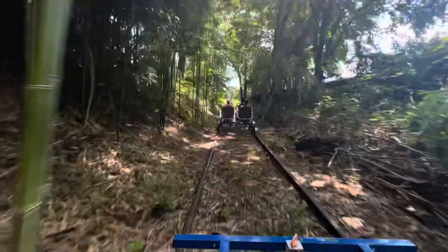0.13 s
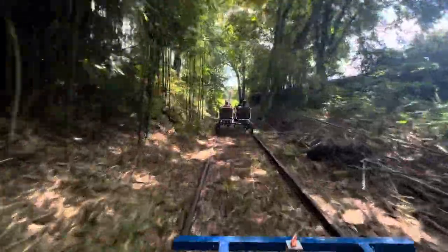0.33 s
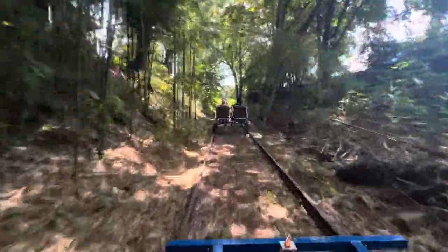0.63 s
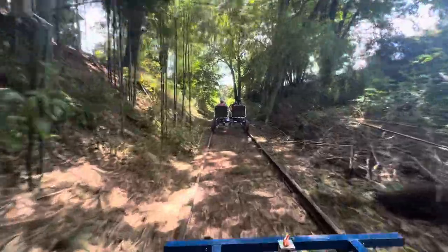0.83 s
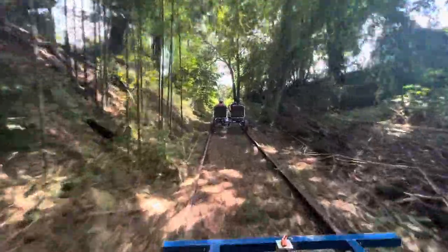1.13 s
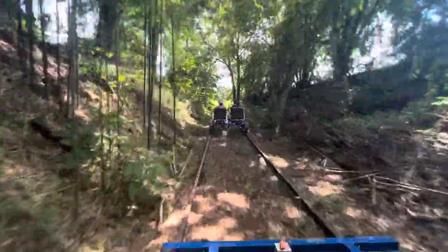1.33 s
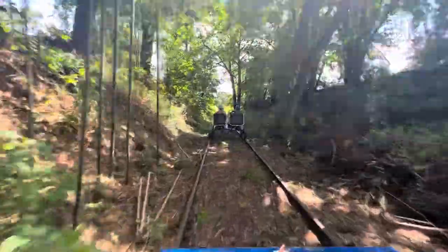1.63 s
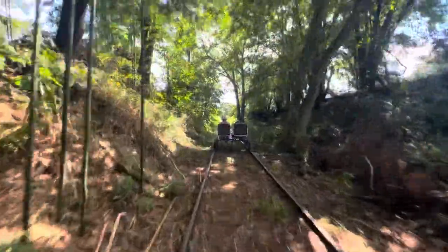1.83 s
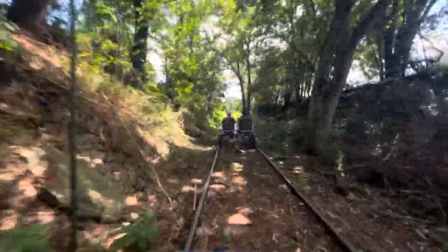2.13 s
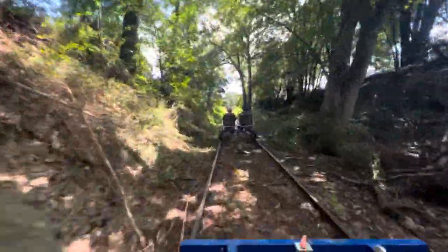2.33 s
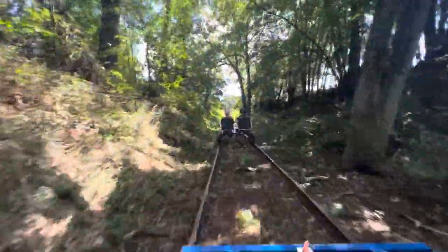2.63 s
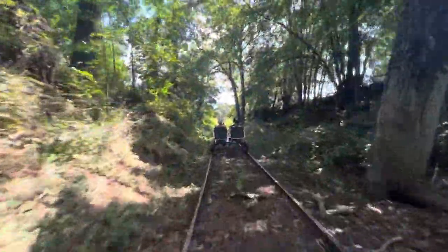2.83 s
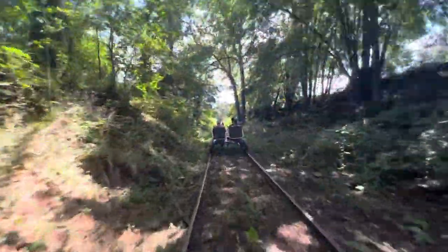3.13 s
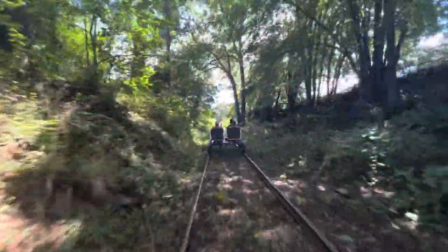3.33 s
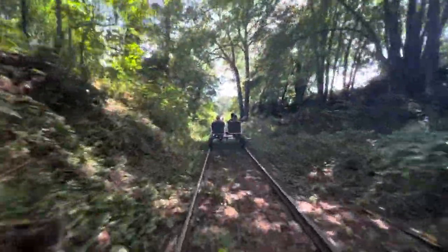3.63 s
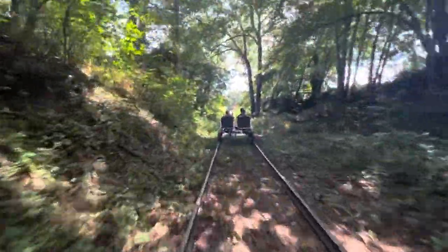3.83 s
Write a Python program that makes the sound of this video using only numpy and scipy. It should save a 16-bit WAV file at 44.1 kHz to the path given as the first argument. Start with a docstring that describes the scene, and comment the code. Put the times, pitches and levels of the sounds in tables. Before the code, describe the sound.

A rail bike rolls through a wooded cutting, heard in stereo from the seat: gritty rumble and hiss, early joint clanks, a rougher roaring middle, a calm, then faint squeaks and three heavy clacks.

```python
"""A pedal rail bike rolls along an old track in a wooded cutting, heard from the seat for four seconds.
Rust and grit keep the frame rumbling, roaring and hissing throughout, while loose fittings jiggle and knock.
Three joints come early: each wheel drop is a burst of chattering contacts that rings the frame, steel and body.
Rougher rail follows with four more joints, and flanges graze the rail and ring the wheel's modes.
It calms; then come two thin gliding squeaks and three more joints. The banks return a short noise-tail echo."""
import sys
import numpy as np
from scipy import signal
from scipy.fft import rfft, irfft
from scipy.io import wavfile
from scipy.ndimage import uniform_filter1d

SR = 44100
rng = np.random.default_rng(int(sys.argv[2]) if len(sys.argv) > 2 else 0)


def transcribe(u):
    """Save the signal u as a 16-bit wav file named by the first command-line argument.

    u: samples, shape (n,) or (channels, n), limited to [-1, 1]; the rate is SR.
    q: integer samples, one column per channel.
    """
    v = np.clip(np.atleast_2d(u).T, -1, 1)
    q = np.round(v * 32767).astype(np.int16)
    wavfile.write(sys.argv[1], SR, q)


N = 176400

# frame resonances: (frequency [Hz], width [Hz], boost [dB])
FRAME = [(320, 15, 5.5), (1007.5, 47, 5.5)]
# colour of clashing, scraping steel: (frequency [Hz], relative level [dB])
STEEL = [(900, -6.5), (2400, 7), (4000, -1.5), (9000, -0.5), (10300, -15), (12400, -5.5), (14000, -29),
         (15600, -16)]
# colour of loose parts knocking: (frequency [Hz], relative level [dB])
KNOCK = [(250, -11.5), (800, -1.5), (1300, 1.5), (1750, -0.5), (2500, -9.5), (3600, -21.5), (10000, -40)]
# level of the rolling: (time [s], roar level [dB], hiss level [dB])
ROLL_DB = [(0, -29.5, -32), (.3, -35, -38.5), (.8, -34.5, -40), (.98, -32.5, -41), (1.17, -33, -38.5),
           (1.25, -28, -34), (1.36, -34, -37.5), (1.52, -23, -36), (1.63, -29, -36), (1.8, -27.5, -36.5),
           (2, -35.5, -40.5), (2.55, -34.5, -42.5), (3.05, -37, -43), (3.35, -40.5, -44.5),
           (3.55, -29.5, -34.5), (3.72, -36.5, -41), (4, -35, -43)]

GRIT_PER_S, GRIT_SCATTER_DB = 2500, 3.5
CONTACT_SCATTER_DB = 1  # unevenness of the contacts in a blow
CLANK_PER_S, CLANK_DECAY_S = 700, 0.02  # chattering contacts of the frame
STEEL_PER_S, STEEL_T60_S = 1200, 0.036
ROAR_LIKE, BLOW_LIKE = 0.25, 0.43  # likeness of left and right
GRAZE_PAN_DB = 5  # left over right


def undb(db):
    """Decibels to amplitude."""
    return 10 ** (np.asarray(db) / 20)


def unit(x):
    """Scale to an rms of 1."""
    return x / np.sqrt(np.mean(x ** 2) + 1e-20)


def pan(db):
    """Left and right gains that lie db apart."""
    return undb(np.array([[db], [-db]]) / 2)


def add(out, s, x):
    """Mix a sound in at s seconds."""
    i = max(int(s * SR), 0)
    out[:, i:i + x.shape[1]] += x[:, :max(N - i, 0)]


def colour(x, points, resonances=(), size=4096):
    """Causal minimum-phase filter from (Hz, dB) points and resonant peaks."""
    f = np.arange(size // 2 + 1) * SR / size + 1
    points = np.array(points)
    db = np.interp(np.log(f), np.log(points[:, 0]), points[:, 1])
    for hz, width, boost in resonances:
        db = db + boost / (1 + (2 * (f - hz) / width) ** 2)
    # folding the cepstrum onto positive times makes the filter causal
    cepstrum = irfft(np.log(undb(db)))
    cepstrum[1:size // 2] *= 2
    cepstrum[size // 2 + 1:] = 0
    impulse = irfft(np.exp(rfft(cepstrum)))
    return signal.fftconvolve(x, impulse[None], axes=1)[:, :x.shape[1]]


def blend(pair, like):
    """Two unrelated signals made into left and right of a given likeness."""
    like = np.clip(like, -.95, .95)
    shared = np.sqrt(1 + like) * pair[0]
    opposed = np.sqrt(1 - like) * pair[1] * np.array([[1], [-1]])
    return (shared + opposed) / np.sqrt(2)


def walk(rate):
    """Smooth random drift with an rms of 1, heading for a new value rate times a second."""
    k = max(int(SR / rate), 2)
    steps = np.repeat(rng.standard_normal(N // k + 1), k)
    return unit(uniform_filter1d(steps, k)[:N])


def contacts(shape, rate, scatter_db):
    """Tiny impacts at random moments, uneven in size and of either sign."""
    struck = rng.random(shape) < rate / SR
    sign = np.sign(rng.standard_normal(shape))
    return struck * sign * undb(scatter_db * rng.standard_normal(shape))


def tail(t60, size=16384):
    """Dense noise ringing that dies away: two channels, unit energy on average."""
    decay = np.exp(-np.log(1000) * np.arange(size) / SR / t60)
    return unit(rng.standard_normal((2, size)) * decay) / np.sqrt(size)


def even(x, size=45):
    """Flatten the broad colour of a burst and keep its fine grain."""
    spectrum = rfft(x)
    power = uniform_filter1d(np.abs(spectrum) ** 2, size, axis=1)
    return irfft(spectrum / np.sqrt(power + 1e-9), x.shape[1])


def mode(push, hz, t60):
    """One decaying resonance, as a complex signal."""
    pole = np.exp((2j * np.pi * hz - np.log(1000) / t60) / SR)
    return signal.lfilter([1], [1, -pole], push)


def swell(rise, hold, decay, size=14000):
    """Force of a blow: a curved rise, a hold, an exponential decay."""
    t = np.arange(size) / SR
    attack = np.minimum(t / max(rise, 1 / SR), 1) ** 1.13
    return attack * np.exp(-np.maximum(t - rise - hold, 0) / decay)


def blow(rise, hold, rate, decay, t60, points, like, extra=(), size=14000):
    """A burst of chattering contacts rings one part of the bike; rms 1 over its loud stretch."""
    env = swell(rise, hold, decay)
    hits = contacts(size, rate, CONTACT_SCATTER_DB) * env
    hits[int(abs(rise) * SR)] += 2.08  # a sure contact at the end of the rise
    ring = tail(t60, size=4096)
    ring[0, 0] += 0.39  # crack at the start of each contact
    burst = even(signal.fftconvolve(hits[None], ring, axes=1))[:, :size]
    coloured = colour(blend(burst, like), points, [*FRAME, *extra])
    return unit(coloured) * np.sqrt(np.mean(env ** 2))


def bank_echo(blows):
    """The banks scatter the blows back as a short dense tail."""
    return undb(-13) * signal.fftconvolve(blows, tail(t60=0.39), axes=1)


def rolling():
    """Rust and grit under the treads shake the chassis, roar in the frame and hiss at the rims."""
    # colours of the three layers: (frequency [Hz], relative level [dB])
    rumble_colour = [(20, -57), (35, -32), (50, -2), (72, 1.5), (220, -4.5), (330, -10.5), (600, -14),
                     (6000, -94)]
    roar_colour = [(150, -26), (350, -3), (550, 3), (780, -4), (1050, 2), (1300, 2.5), (1900, -6),
                   (2600, -13.5), (4000, -28), (12000, -40)]
    hiss_colour = [(1500, -6), (3000, 4.5), (4200, -1.5), (6500, 1.5), (8800, 1.5), (10300, -12.5),
                   (12300, -1), (14000, -29), (15600, 2.5)]
    # rumble as the rail gets rougher and smoother: (time [s], level [dB])
    rumble_db = [(0, -31), (.45, -36), (.65, -31), (.9, -34), (1.1, -30), (1.37, -31), (1.49, -17),
                 (1.76, -21.5), (1.83, -29), (2.051, -37), (2.5, -33), (2.7, -37), (3.35, -40),
                 (3.6, -32.5), (4, -33)]
    t = np.arange(N) / SR
    rumble_s, rumble_level = np.array(rumble_db).T
    roll_s, roar_level, hiss_level = np.array(ROLL_DB).T
    layers = [(rumble_colour, -0.23, rumble_s, rumble_level),
              (roar_colour, ROAR_LIKE, roll_s, roar_level),
              (hiss_colour, 0, roll_s, hiss_level)]
    out = 0
    for points, like, times, db in layers:
        grit = unit(contacts((2, N), GRIT_PER_S, GRIT_SCATTER_DB)) + rng.standard_normal((2, N))
        layer = unit(colour(blend(grit, like), points, FRAME))
        flutter_db = 2.5 * walk(26)
        out = out + layer * undb(np.interp(t, times, db) + flutter_db)
    return out


def jiggle():
    """Loose fittings jiggle at random, harder where the rail is rough."""
    hits = contacts((2, N), rate=150, scatter_db=3.6)
    taps = signal.fftconvolve(hits, tail(t60=.026, size=4096), axes=1)[:, :N]
    x = unit(colour(blend(taps, ROAR_LIKE), KNOCK, FRAME))
    roll_s, roar_level, _ = np.array(ROLL_DB).T
    return x * undb(-4 + np.interp(np.arange(N) / SR, roll_s, roar_level))


def waver(x, count=20):
    """The frame's resonances swell and fade on their own as the contact patches move."""
    step_hz = 140  # spacing of the overlapping bands
    spectrum, f = rfft(x), np.arange(N // 2 + 1) * SR / N
    out = x
    for k in range(1, count):
        band = irfft(spectrum * np.maximum(1 - np.abs(f / step_hz - k), 0), N)
        gain = undb(2.4 * walk(18))
        out = out + band * (unit(gain) - 1)
    return out


def squeaks():
    """A wheel briefly sings on one arching, unsteady note."""
    # thin wheel squeaks: (time [s], length [s], level [dB])
    squeak_list = [(3.102, 0.11, -44), (3.35, 0.085, -40.5)]
    out = np.zeros((2, N))
    for s, length, db in squeak_list:
        arch = np.sin(np.linspace(0, np.pi, int(length * SR)))
        bend = 0.016 * (arch - .5)
        unsteadiness = 0.0079 * walk(410)[:len(arch)]
        hz = 5780 * (1 + bend + unsteadiness)
        note = np.sin(2 * np.pi * np.cumsum(hz) / SR)
        add(out, s, undb(db) * arch * note * pan(GRAZE_PAN_DB))
    return out


def flanges(size=10000):
    """A flange scrapes the rail head and rings the wheel's modes, wobbling under the load."""
    # flange grazing the rail: (time [s], length [s], level [dB])
    graze_list = [(0.247, 0.037, -26), (1.438, 0.023, -27.5), (1.474, 0.047, -28.5), (1.525, 0.011, -30),
                  (2.042, 0.021, -28.5), (2.343, 0.021, -30.5), (2.479, 0.036, -33)]
    # steel wheel modes: (frequency [Hz], level [dB])
    wheel_modes = [(5150, -3.5), (5750, -11), (6150, -5), (6340, -2.5), (7000, -4), (7330, 2.5), (9100, 0),
                   (11150, -1), (13070, -13), (14650, -6)]
    out, t = np.zeros((2, N)), np.arange(size) / SR
    for s, length, db in graze_list:
        pressure = np.sin(np.pi * np.minimum(t / length, 1))
        rub = contacts((2, size), GRIT_PER_S, GRIT_SCATTER_DB) * pressure
        ringing = 0
        for hz, mode_db in wheel_modes:
            # each touch rings the modes a little differently
            detune, strength = rng.standard_normal(2)
            ring = mode(rub, hz * (1 + .006 * detune), t60=.055)
            wobble_hz = 45 * walk(300)[:size]
            wobble = np.exp(2j * np.pi * np.cumsum(wobble_hz) / SR)
            ringing = ringing + undb(mode_db + 2 * strength) * unit((ring * wobble).imag)
        x = unit(ringing) + undb(-3) * unit(colour(rub, STEEL))
        # the square root makes the level hold for the length of the graze
        add(out, s, x * np.sqrt(length * SR / size) * undb(db) * pan(GRAZE_PAN_DB))
    return out


def rattles():
    """Loose parts knock during and between the joints, each a very short blow on body and steel."""
    # loose parts knocking: (time [s], body level [dB], steel level [dB])
    knock_list = [(.532, -18.5, -26), (0.965, -17.5, -40), (.993, -22, -39), (1.091, -18, -40),
                  (1.253, -15.5, -30), (1.482, -21, -20), (1.568, -17.5, -47), (1.695, -26, -51),
                  (1.717, -13, -39), (1.75, -18, -39), (2.084, -24, -24.5), (2.757, -26.5, -38),
                  (2.952, -31, -33), (3.226, -15.5, -21.5), (3.268, -20.5, -42), (3.523, -20, -20.5),
                  (3.597, -31, -35), (3.913, -26.5, -54)]
    hold_s, decay_s = .003, .003
    out = np.zeros((2, N))
    for s, body_db, steel_db in knock_list:
        knock = blow(0, hold_s, CLANK_PER_S, decay_s, t60=.024, points=KNOCK, like=BLOW_LIKE)
        add(out, s, undb(body_db) * knock)
        clink = blow(0, hold_s, STEEL_PER_S, decay_s, STEEL_T60_S, STEEL, like=0)
        add(out, s, undb(steel_db) * clink)
    return out


def bounces(size=8000):
    """The chassis lands and swings for a few slowing cycles: a low, falling thump."""
    # chassis bouncing on its wheels: (time [s], level [dB], starting pitch [Hz], swell [s])
    bounce_list = [(0.062, -20, 182, 0.0068), (0.312, -21, 215, 0.0072), (0.336, -17.5, 171, 0.0085),
                   (.524, -15, 161, 0.003), (1.757, -13, 188, 0.0051), (1.778, -10, 190, 0.0073),
                   (3.207, -8.5, 215, .003), (3.5, -22.5, 160, 0.0085), (3.785, -7, 181, 0.0022)]
    sag_s = .06  # time in which the pitch halves
    out, t = np.zeros((2, N)), np.arange(size) / SR
    for s, db, hz, swell_s in bounce_list:
        phase = 2 * np.pi * np.cumsum(hz / (1 + t / sag_s)) / SR
        swing = np.sin(phase + 1.01 * np.array([[0], [1]]))  # radians between left and right
        env = t / swell_s * np.exp(1 - t / swell_s)
        add(out, s, undb(db) * swing * env)
    return out


def body(rise, hold):
    """The chattering wheel sets the bike's body ringing on a few hollow notes."""
    # body modes rung by a joint: (frequency [Hz], level [dB], t60 [s])
    body_modes = [(241, 0, 0.055), (317, -3, 0.062), (575, -4, 0.082), (983, -2.5, 0.089),
                  (1263, -15, 0.14)]
    env = swell(rise, hold, CLANK_DECAY_S)
    chatter = contacts((2, len(env)), CLANK_PER_S, CONTACT_SCATTER_DB)
    push = blend(chatter, BLOW_LIKE) * env
    ringing = sum(undb(db) * unit(mode(push, hz, t60).imag) for hz, db, t60 in body_modes)
    return unit(ringing) * np.sqrt(np.mean(env ** 2))


def joints():
    """A wheel drops into the gap: the chassis thuds, the frame clanks, the steel clashes, the body rings."""
    # wheel over a joint or a rough weld: (time [s], rise [s], hold [s], thud level [dB],
    # frame level [dB], steel level [dB], body ring level [dB], strongest frame ring [Hz])
    joint_list = [(0.045, 0.0044, 0.0054, -21, -21.5, -25, -41, 2100),
                  (0.24, 0.0079, 0.015, -13.5, -14, -19, -23.5, 2140),
                  (0.519, 0.0097, 0.032, -19.5, -21.5, -28, -29.5, 1230),
                  (1.431, 0.0086, 0.031, -20.5, -20, -27.5, -31, 1370),
                  (1.714, .004, 0.016, -21, -24, -32.5, -25, 1500),
                  (2.025, 0.0049, 0.014, -28.5, -16, -22, -32, 1150),
                  (2.305, 0.0088, 0.036, -33.5, -25.5, -29.5, -33.5, 1460),
                  (3.169, 0.012, 0.026, -21, -14, -21.5, -17, 1420),
                  (3.44, 0.013, 0.014, -24.5, -14, -19.5, -17, 1110),
                  (3.756, 0.02, 0.0039, -21.5, -13.5, -23, -16.5, 1120)]
    # colours of the chassis and frame parts of a blow: (frequency [Hz], relative level [dB])
    thud_colour = [(25, -40), (55, -25.5), (100, 3.5), (180, -2), (250, -0.5), (370, -13.5), (1500, -53.5)]
    clank_colour = [(120, -26.5), (280, -4.5), (480, 2), (750, -1), (1050, 1.5), (1500, 1), (2300, -4.5),
                    (3300, -17.5), (5000, -53)]
    out = np.zeros((2, N))
    for s, rise, hold, thud_db, frame_db, steel_db, body_db, ring_hz in joint_list:
        thud = blow(rise, hold, rate=550, decay=0.022, t60=0.039, points=thud_colour, like=BLOW_LIKE)
        frame_ring = (ring_hz, 430, 5.1)  # Hz, width Hz, boost dB
        clank = blow(rise, hold, CLANK_PER_S, CLANK_DECAY_S, t60=0.029,
                     points=clank_colour, like=BLOW_LIKE, extra=[frame_ring])
        clash = blow(rise, hold, STEEL_PER_S, decay=0.025, t60=STEEL_T60_S, points=STEEL, like=0)
        x = undb(thud_db) * thud + undb(frame_db) * clank + undb(steel_db) * clash
        add(out, s, x + undb(body_db) * body(rise, hold))
    return out


def scene():
    """The bike and the echo of its blows from the banks of the cutting."""
    blows = joints() + bounces() + rattles() + flanges()
    out = blows + waver(rolling() + jiggle()) + squeaks()
    add(out, .025, bank_echo(blows))
    return out


def record(dry):
    """Two spaced microphones, the left a little later and mostly brighter; the top is cut."""
    # left minus right at the microphones: (frequency [Hz], level difference [dB])
    ports = [(1500, 1.5), (4300, 1), (5300, 7.5), (6800, 11.5), (8500, -1), (9500, 1), (11000, 4)]
    left_lag_s, top_hz = .00024, 15800
    left = colour(dry[:1], [(hz, db / 2) for hz, db in ports])[0]
    right = colour(dry[1:2], [(hz, -db / 2) for hz, db in ports])[0]
    left = np.interp(np.arange(N) - left_lag_s * SR, np.arange(N), left)
    top_cut = signal.ellip(14, .2, 80, top_hz, fs=SR, output="sos")
    return signal.sosfilt(top_cut, np.clip([left, right], -1, 1))


dry = scene()
out = record(dry)
transcribe(out)
```